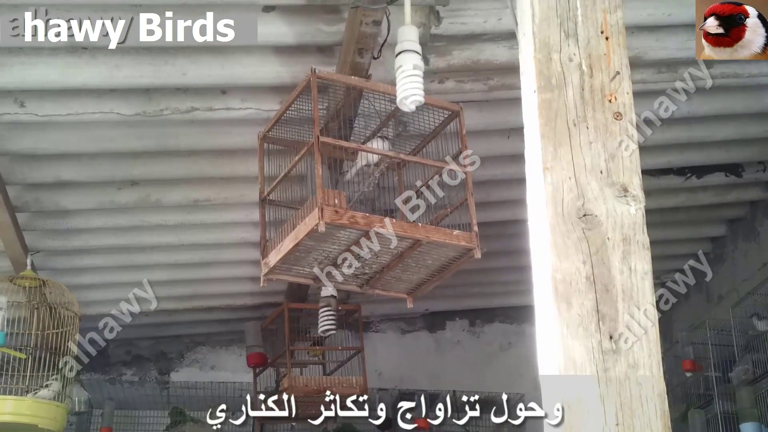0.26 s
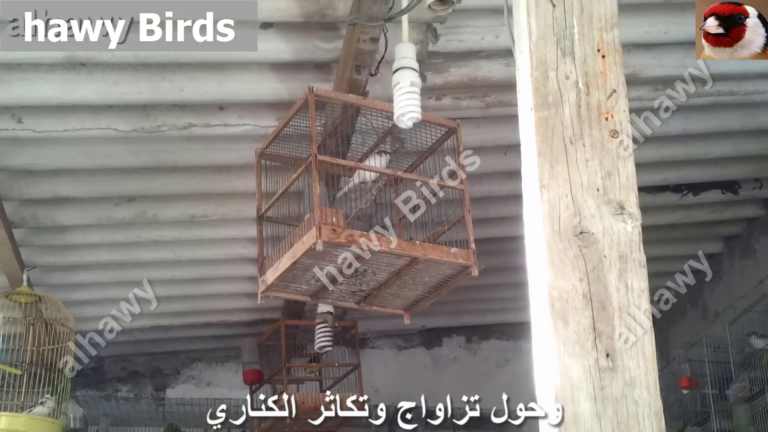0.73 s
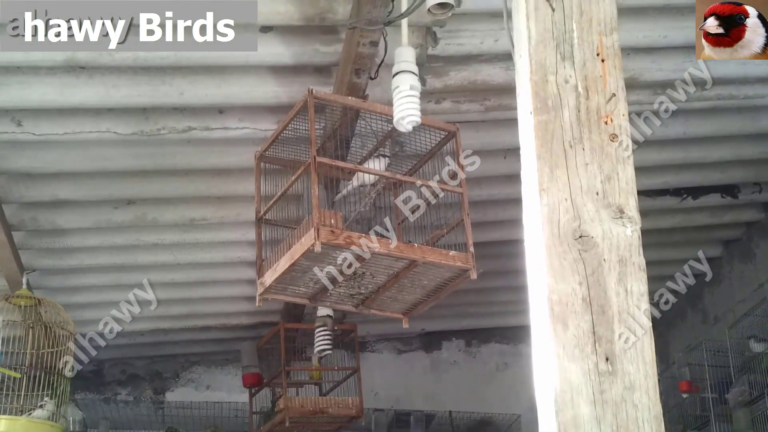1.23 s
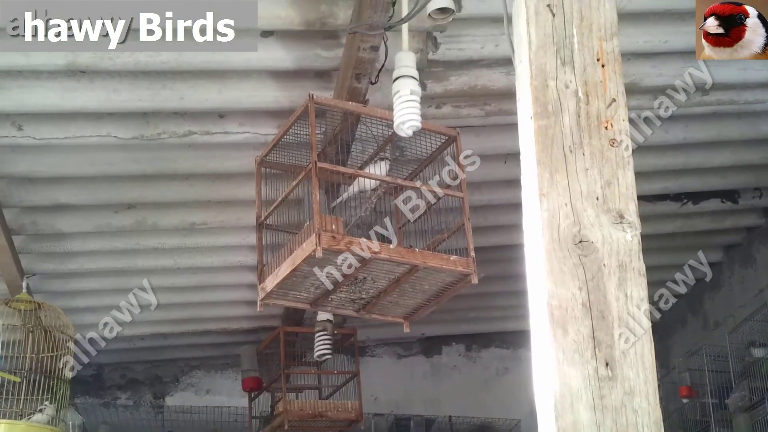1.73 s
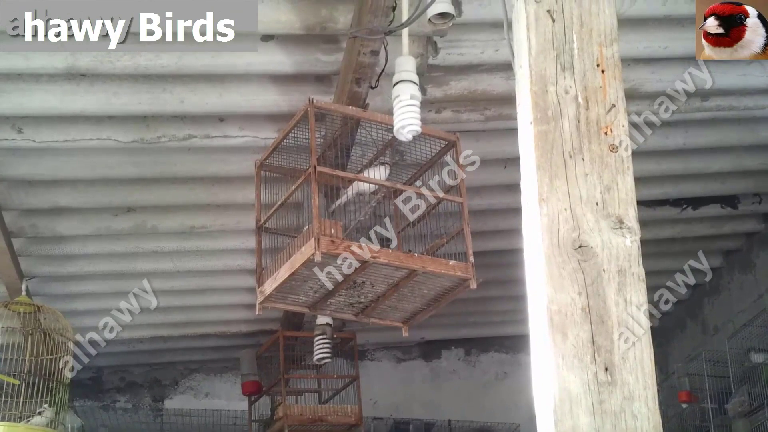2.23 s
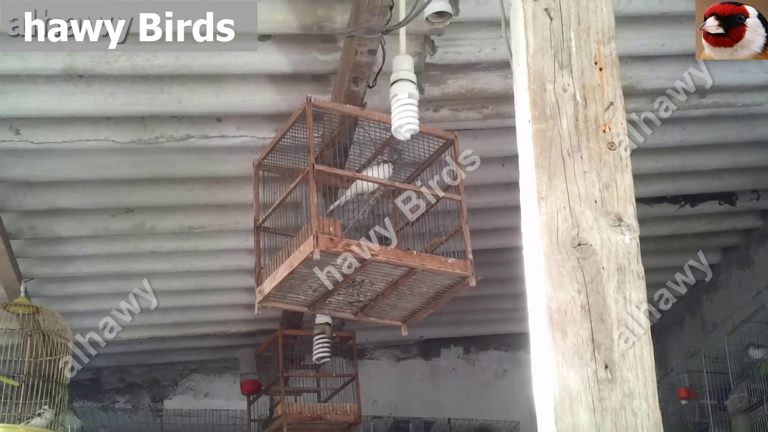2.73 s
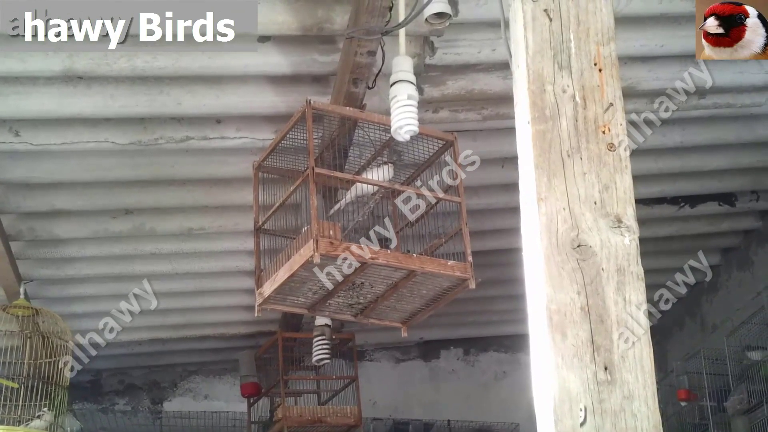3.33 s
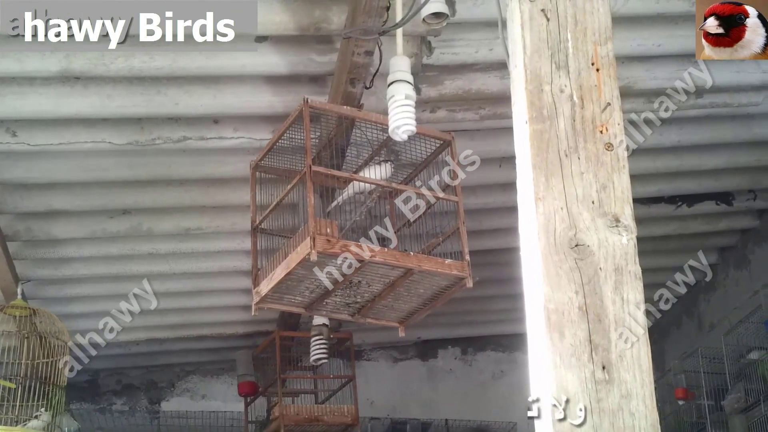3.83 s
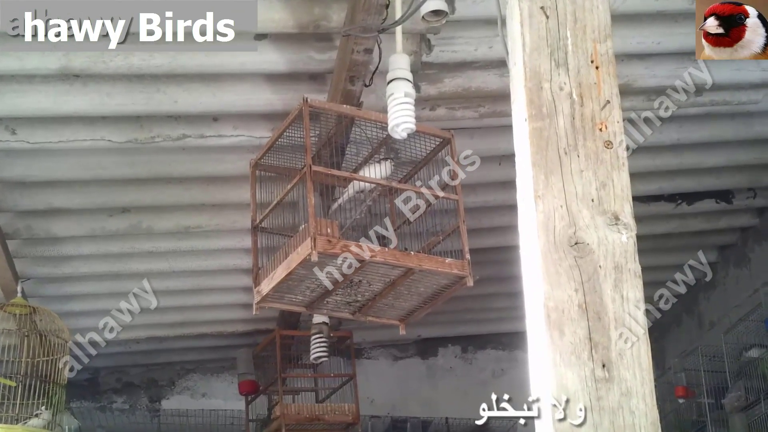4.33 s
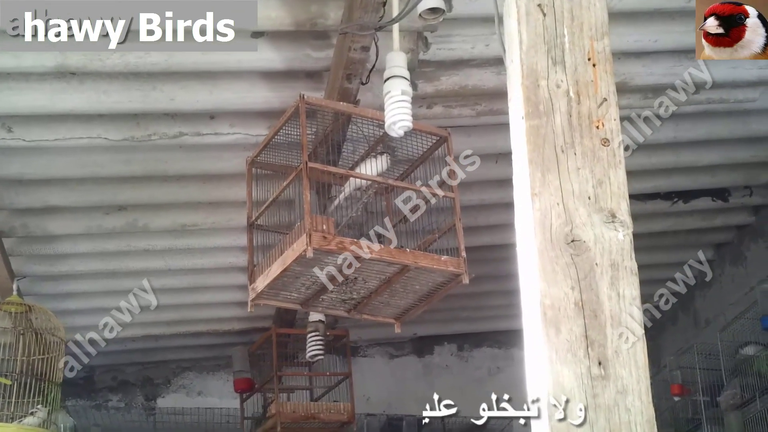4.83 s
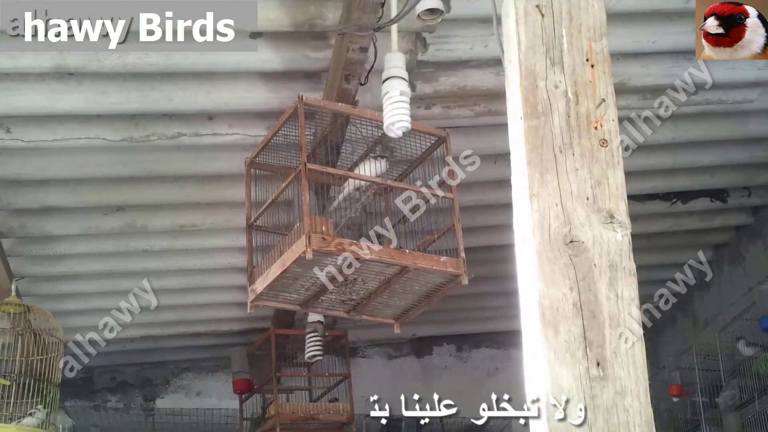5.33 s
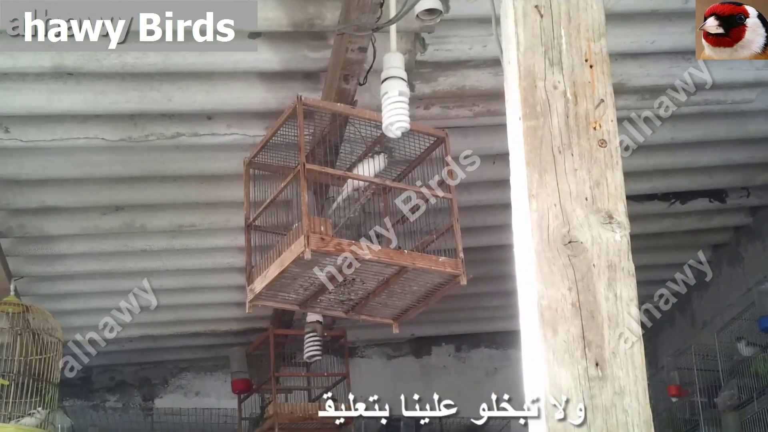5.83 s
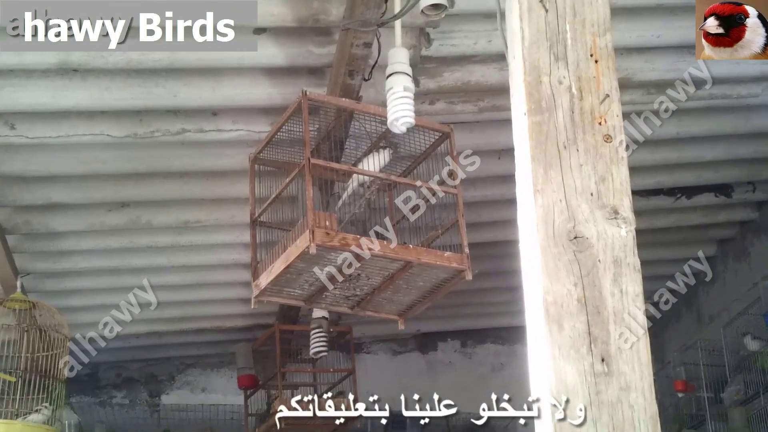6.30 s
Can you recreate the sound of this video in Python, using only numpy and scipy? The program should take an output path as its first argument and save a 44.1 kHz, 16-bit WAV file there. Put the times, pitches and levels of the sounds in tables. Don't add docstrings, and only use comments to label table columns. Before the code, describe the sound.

In a hard-roofed shed a canary a few metres away finishes a low falling roll and fading buzz, then rests. Faint chirps and small cage ticks fill the gap. It resumes with a short high roll and a dry rattle that swells into a long, loud, gradually slowing trill, ending in clear whistles. A low fan hum and light hiss run beneath, picked up by a handheld stereo microphone.

```python
import sys
import numpy as np
from scipy import signal
from scipy.fft import rfft, irfft
from scipy.io import wavfile
from scipy.ndimage import uniform_filter1d

SR = 44100
rng = np.random.default_rng(int(sys.argv[2]) if len(sys.argv) > 2 else 0)


def volts_from_decibels(level):
    exponent = np.asarray(level, float) / 20
    return 10 ** exponent


def wrap_up_sound(samples):
    columns = np.atleast_2d(samples).T
    tamed = np.clip(columns, -1, 1)
    steps = np.round(tamed * 32767).astype(np.int16)
    wavfile.write(sys.argv[1], SR, steps)


N = 289296
LEAD_S = 0.15


def level(x, db):
    return x * volts_from_decibels(db) / np.sqrt(np.mean(x ** 2))


def along(table, hz):
    table_hz, value = np.transpose(table)
    return np.interp(np.log(hz + 1), np.log(table_hz), value)


def walk(rate, size):
    k = max(int(SR / rate), 2)
    smooth = uniform_filter1d(uniform_filter1d(rng.standard_normal(size + 2 * k), k), k)
    return smooth[k:k + size] * np.sqrt(1.733 * k)


def silence():
    return np.zeros((2, N + int(LEAD_S * SR)))


def add(track, start, sound):
    i = int((start + LEAD_S) * SR)
    track[..., i:i + sound.shape[-1]] += sound[..., :track.shape[-1] - i]


def ports(sound, pan_db):
    return sound * volts_from_decibels(np.array([[pan_db], [-pan_db]]) / 2)


# frequency in Hz, level in dB per Hz.
HISS_SPECTRUM = [(900, 9.5), (1500, 6), (4500, 2.5), (8000, -4.5), (11000, 0.5), (13000, -1.5), (15000, 2)]


def hiss():
    hz = np.arange(N // 2 + 1) * SR / N
    spectrum = rfft(rng.standard_normal((2, N))) * volts_from_decibels(along(HISS_SPECTRUM, hz)) * (hz > 500)
    return level(irfft(spectrum, N), -61.5)


# frequency in Hz, level in dB per Hz.
HUM_SPECTRUM = [(30, -29.5), (150, -7.5), (199, 5), (330, -6.5), (725, -22), (863, -32), (1300, -35),
                (1700, -81)]
# frequency in Hz, correlation from 0 to 1.
HUM_COHERENCE = [(30, 0.31), (130, 0.91), (290, 0.84), (630, 0.69), (1200, 0.02)]
# time in seconds, bass gain in dB.
DRAUGHT = [(0, -3.5), (.55, -7), (1, -4.5), (1.3, 0), (3.499, -1), (4.1, 6.5), (5.2, 7.5), (5.498, 1),
           (6.56, 6)]


def fan():
    hz = np.arange(N // 2 + 1) * SR / N
    alike = np.clip(along(HUM_COHERENCE, hz), 0, 1)
    mid, side = rfft(rng.standard_normal((2, N))) * volts_from_decibels(along(HUM_SPECTRUM, hz)) * (hz > 15)
    common, differing = mid * np.sqrt(1 + alike), side * np.sqrt(1 - alike)
    pair = np.array([common + differing, common - differing])

    deep = 1 / (1 + (hz / 110) ** 4)
    upper = 1 / (1 + (350 / (hz + 1)) ** 4)
    draught_db = np.interp(np.arange(N) / SR, *np.transpose(DRAUGHT))
    rumble = irfft(pair * deep, N) * volts_from_decibels(draught_db + 2 * walk(6.9, N))
    rumble += irfft(pair * upper, N) * volts_from_decibels(1.5 * walk(7.4, N))
    rumble += irfft(pair * (1 - deep - upper), N)

    blade_hz = 231.3 * (1 + 0.02547 * walk(5.97, N))
    blade = np.sin(2 * np.pi * np.cumsum(blade_hz) / SR)
    return ports(level(rumble, -42.5) + level(blade, -50.5) * volts_from_decibels(2 * walk(12.0, N)), 2.5)


# start in seconds, length in
# seconds, low edge in Hz, high edge in Hz, level in dB.
RUSTLES = [(1.12, 0.0041, 4000, 9000, -51.5), (1.567, 0.024, 6000, 14200, -62.5),
           (1.91, 0.024, 1000, 13700, -55.5), (2.02, 0.0023, 900, 9000, -80), (2.158, 0.1, 3320, 5650, -68),
           (2.233, 0.076, 2420, 3900, -63), (1.0, 0.09, 2800, 4800, -72), (6.25, 0.14, 1200, 2200, -61.5),
           (2.373, 0.017, 5940, 13200, -77), (2.468, 0.02, 1500, 11600, -60),
           (4.661, 0.021, 3600, 6660, -50.5), (6.457, 0.019, 3940, 14400, -54.5)]


def rustles():
    out = silence()
    for s, length, low_hz, high_hz, db in RUSTLES:
        n = int(length * SR)
        crackle = rng.standard_normal(n) * volts_from_decibels(5.0 * walk(680, n)) * np.hanning(n) ** .5
        band = signal.butter(2, [low_hz, high_hz], "band", fs=SR, output="sos")
        add(out, s, level(signal.sosfilt(band, crackle), db))
    return out


def overtone_notch(hz):
    dip_hz, dip_width_hz, dip_depth = 12200, 660, 0.81
    return (hz < 20000) * (1 - dip_depth * np.exp(-((hz - dip_hz) / dip_width_hz) ** 2))


# low edge in Hz, high edge in Hz.
BREATH_BAND = (3600, 7240)


def whistle(s, hz, db, overtones_db, wobble, growth_db=0, haze_db=-14):
    breath_db, husky_db, unsteady_db = -30, -22, 1.1
    throat_share = 0.19
    effort_slew_s = 0.003
    t = np.arange(s[0], s[-1], 1 / SR)
    n = len(t)
    pitch = uniform_filter1d(np.interp(t, s, hz), 90, mode="nearest") * (1 + wobble * walk(157.0, n))
    phase = 2 * np.pi * (np.cumsum(pitch) / SR + rng.random())
    effort_db = uniform_filter1d(np.interp(t, s, db), int(effort_slew_s * SR), mode="nearest")
    effort_db = effort_db + unsteady_db * walk(94.0, n)
    air = signal.lfilter(*signal.butter(2, BREATH_BAND, "band", fs=SR), rng.standard_normal(n))

    upper = np.zeros(n)
    for multiple, over_db in enumerate(overtones_db, 2):
        upper += volts_from_decibels(over_db) * np.sin(multiple * phase) * overtone_notch(multiple * pitch)
    upper *= 0.35 + volts_from_decibels(haze_db) * walk(600, n)
    undamped_db = throat_share * (effort_db.max() - effort_db)
    upper *= volts_from_decibels(undamped_db + growth_db * np.linspace(-.5, .5, n))

    tone = np.sin(phase) + volts_from_decibels(breath_db) * air + upper
    tone *= 1 + volts_from_decibels(husky_db) * walk(1094, n)
    edge = np.clip(np.minimum(t - s[0], s[-1] - t) / 0.001, 0, 1)
    return np.sqrt(2) * tone * edge * volts_from_decibels(effort_db)


# start in seconds, level in dB, pitch factor.
CHIRPS = [
    (.005, -64, 0.96),
    (0.52, -56, 0.95),
    (1.132, -53, 1.01),
    (1.74, -54.5, 1),
    (2.501, -52.5, 1.02),
    (3.406, -52, 0.99),
    (5.63, -52.5, 1),
]
# time in ms, pitch in Hz, effort in dB.
CHIRP = [(0, 6000, -8), (10, 6030, 1), (40, 5680, 3), (65, 5450, -4), (80, 5400, -20)]
# start in seconds, length in seconds, start pitch in Hz, level in dB.
FALLING_NOTES = [(.95, .05, 1130, -75), (1.035, .023, 4510, -71), (1.055, .014, 3690, -68),
                 (1.2, .04, 4000, -74), (1.21, .07, 3400, -75), (1.235, .05, 5250, -62),
                 (1.45, .05, 3750, -77), (1.51, .05, 2650, -72), (1.53, .04, 5400, -72),
                 (1.535, .06, 4420, -70), (2.156, .033, 5100, -73), (2.27, .019, 4800, -65),
                 (2.4, .05, 4800, -73), (2.65, .089, 4450, -69), (4.93, .065, 8400, -64),
                 (6.405, .035, 5350, -53), (6.488, .056, 4360, -55)]
LEVEL_NOTES = [(.14, .015, 5180, -59), (2.2, .03, 4705, -67), (2.27, .02, 5250, -64),
               (3.49, .12, 4353, -64), (3.5, .048, 8720, -66), (4.125, .02, 4400, -60),
               (4.245, .045, 5300, -56.5), (4.31, .03, 5300, -61), (4.36, .015, 4540, -62),
               (5.43, .03, 4300, -60), (5.751, .049, 4500, -58), (6.46, .016, 6800, -52.5)]
RISING_NOTES = [(1.849, .06, 4390, -64), (1.868, .035, 8900, -73), (2.187, .08, 3776, -72),
                (2.2, .04, 5200, -70), (2.26, .03, 2800, -64), (4.942, .03, 4050, -59),
                (5.808, .02, 5100, -57)]
SCOLDS = [
    (6.465, 0.0043, 6760, -38),
    (6.47, 0.016, 5840, -52),
]
NOTE_KINDS = [(FALLING_NOTES, 0.924), (LEVEL_NOTES, 1), (RISING_NOTES, 1.05), (SCOLDS, 0.59)]


def far_birds():
    out = silence()
    ms, hz, db = np.transpose(CHIRP)
    for s, chirp_db, factor in CHIRPS:
        lower = whistle(ms / 1000, hz * factor, db + chirp_db, (-30,), 0.01)
        upper = whistle(ms / 1000, hz * factor * 1.125, db + chirp_db - 10.5, (), 0.01)
        add(out, s, ports(lower + upper, 1.3))

    swell = np.array([0, .2, .7, 1])
    swell_db = 0.1 + np.array([8.0, 3.0, 5.5, -8.0])
    for notes, glide in NOTE_KINDS:
        for s, length, start_hz, note_db in notes:
            pitch = start_hz * glide ** swell
            note = whistle(swell * length, pitch, note_db + swell_db, (-34,), 0.03)
            add(out, s, ports(note, 3 + 2.5 * rng.standard_normal()))
    return out


# time in seconds, pitch in Hz, level in dB.
WHISTLES = [
    [(2.468, 2200, -54), (2.482, 2930, -52), (2.492, 3075, -49.5), (2.515, 3280, -41), (2.522, 3300, -75)],
    [(6.297, 2540, -39), (6.31, 2730, -33), (6.345, 2880, -21), (6.372, 2928, -34.5), (6.395, 2955, -24.5),
     (6.42, 2956, -33), (6.44, 2980, -43), (6.457, 3083, -46), (6.467, 2960, -73)],
    [(6.512, 2700, -63), (6.53, 2740, -26.5), (6.545, 2860, -29.5), (6.575, 3140, -5)],
]
# levels of the 2nd, 3rd and 4th harmonics in dB.
WHISTLE_OVERTONES = [
    (-8, -14, -30),
    (-27, -34, -55),
    (-27, -33, -50),
]


def held_whistles():
    out = silence()
    for rows, overtones_db in zip(WHISTLES, WHISTLE_OVERTONES):
        s, hz, db = np.transpose(rows)
        add(out, s[0], ports(whistle(s, hz, db, overtones_db, 0.004), 1.5))
    return out


# time in ms from its centre, pitch in Hz, effort in dB.
FALL = [(-27.5, 2900, -19), (-21, 2780, -10), (-12.5, 2620, 3), (-2.5, 2470, 3.5), (5.5, 2320, 1.5),
        (14, 2140, -10.5)]
HIGH_FALL = [(-24, 4080, -10), (-17, 3980, -1.5), (-7, 3800, -1.5), (2.5, 3620, 1.5), (12.5, 3330, -4),
             (19, 2800, -19)]
FLICK = [(-6.5, 2350, -4), (-5.5, 2600, -3.5), (-3.5, 3300, 10), (-1.5, 3720, -1), (0, 5000, -9)]
FAST_RISE = [(-16, 1400, -35), (-10, 2400, -18.5), (-10, 2695, -3.5), (-4, 3000, 4.5), (2.5, 3200, 3),
             (7.5, 3273, -4.5), (9.5, 3600, -52)]
MID_RISE = [(-23, 1900, -22.5), (-15.5, 2420, -22.5), (-16.5, 2684, -2), (-8, 3000, 3.5), (1, 3170, -1),
            (14.5, 3290, -12), (10.5, 4000, -45)]
SLOW_RISE = [(-30, 1900, -26), (-21, 2450, -20), (-21.5, 2740, -1), (-16, 2930, 0.5), (-8, 3070, -0.5),
             (-0.5, 3170, 3), (6, 3275, -4.5), (10, 3310, -45)]
BUZZ = [(-8, 2100, -15), (-5.5, 2050, -11), (2, 1820, -1), (5.5, 1420, -2.5), (6.5, 830, -27)]
# centre in seconds, level in dB.
FALLING_ROLL = [(-0.11, -38), (-0.058, -28), (-0.006, -39), (0.039, -35.0), (0.093, -35), (0.145, -35.5),
                (0.199, -35), (0.253, -33), (0.311, -33), (0.365, -34), (0.425, -33.5), (0.485, -34),
                (0.542, -33.5), (0.602, -34.5), (0.662, -33.5), (0.722, -38.5)]
FADING_BUZZ = [(.73, -37), (.752, -42), (.77, -44), (.785, -41.5), (.8, -42), (.815, -47), (.832, -43.5),
               (.85, -40), (.868, -48), (.884, -59.5), (.9, -74), (.92, -67)]
HIGH_ROLL = [(2.533, -46.0), (2.581, -37.5), (2.629, -38.5), (2.679, -40), (2.729, -39), (2.785, -41),
             (2.844, -46)]
RATTLE = [(2.977, -50), (3.0, -53), (3.022, -51), (3.046, -49), (3.07, -46.5), (3.095, -50), (3.119, -48.5),
          (3.144, -46), (3.167, -46.5), (3.192, -45.5), (3.218, -44), (3.24, -46), (3.267, -47),
          (3.292, -45), (3.317, -43.5), (3.343, -42.5), (3.37, -42), (3.396, -41), (3.422, -41.5),
          (3.447, -41), (3.475, -43), (3.5, -42), (3.527, -42), (3.553, -43.5), (3.581, -41)]
FAST_TRILL = [(3.656, -35.5), (3.694, -33.5), (3.732, -33), (3.77, -31.5), (3.807, -32), (3.844, -30),
              (3.881, -27), (3.919, -24.5), (3.957, -27.5), (3.995, -28), (4.031, -26.5), (4.069, -27.5),
              (4.108, -29), (4.145, -26.5), (4.184, -31.5), (4.222, -29), (4.26, -27.5), (4.298, -25.5),
              (4.337, -26.5), (4.376, -27.5), (4.414, -30), (4.453, -30.5), (4.491, -28), (4.53, -29.5),
              (4.569, -32.0)]
MID_TRILL = [(4.61, -25), (4.653, -26), (4.697, -22.5), (4.741, -22), (4.785, -23), (4.83, -22.5),
             (4.875, -23.5), (4.921, -23.5), (4.969, -21.5), (5.016, -20.5), (5.066, -20), (5.113, -23.5),
             (5.16, -22.5), (5.209, -21.5), (5.258, -21.5)]
SLOW_TRILL = [(5.313, -22), (5.365, -20.5), (5.42, -22.0), (5.474, -23), (5.528, -21.5), (5.58, -23.5),
              (5.636, -23.5), (5.691, -21.5), (5.747, -24), (5.802, -21.5), (5.86, -20.5), (5.919, -21.5),
              (5.977, -21), (6.036, -22), (6.092, -23), (6.149, -21.5), (6.207, -23.5)]
FALL_OVERTONES = (-27, -28, -34, -62, -36)
# syllables, shape, overtones from the 2nd in dB, overtone growth through a syllable in dB,
# share the pitch climbs over the phrase, overtone flutter in dB.
PHRASES = [(FALLING_ROLL, FALL, FALL_OVERTONES, 27.7, 0.034, -7),
           (FADING_BUZZ, BUZZ, (-18, -19, -21), .1, -0.31, -10),
           (HIGH_ROLL, HIGH_FALL, (-19, -20, -62), -18, 0.011, -13.5),
           (RATTLE, FLICK, (-16.5, -49, -58), -13, 0.027, -8),
           (FAST_TRILL, FAST_RISE, (-25.5, -30.5, -30), 0.85, 0.015, -8),
           (MID_TRILL, MID_RISE, (-25.5, -29, -30.5), 1.6, 0.00089, -12.5),
           (SLOW_TRILL, SLOW_RISE, (-23.5, -29, -35), 1.2, 0.0031, -17)]
# time in seconds, left minus right in dB.
HEAD_TURN = [(.7, 0.5), (2.5, 2), (4.2, 1.5), (4.8, 1), (5.7, 2), (6.3, 1)]


def canary_phrases():
    out = silence()
    for syllables, shape, overtones_db, growth_db, climb, haze_db in PHRASES:
        ms, hz, db = np.transpose(shape)
        for k, (centre, effort_db) in enumerate(syllables):
            chance = rng.standard_normal(3)
            times = ms / 1000 * (1 + .04 * chance[0])
            factor = 1 + climb * (k / (len(syllables) - 1) - .5) + 0.0074 * chance[1]
            syllable_db = db + effort_db + 0.5 * chance[2]
            sound = whistle(times, hz * factor, syllable_db, overtones_db, 0.0036, growth_db, haze_db)
            add(out, centre + times[0], ports(sound, np.interp(centre, *np.transpose(HEAD_TURN))))
    return out


# delay in ms, level in dB.
ECHOES = [
    [(2.11, -18), (3.5, 0), (6.29, -30), (8.4, -26), (11.59, -6), (16.92, -28.5)],
    [(2.14, -38.5), (2.48, -13.5), (5.08, -17), (7.19, -1), (10.46, -7), (14.83, -6.5)],
]
# frequency in Hz, gain in dB.
TAIL_COLOUR = [(1500, -3), (2200, 2.5), (2900, 0), (4500, 4), (7000, 3), (13000, 4)]


def shed(sound, tail_db, t60, near):
    cluster_db, cluster_t60_s = 7, 0.031
    size = sound.shape[1]
    early = np.zeros((2, 1024))
    early[:, 0] = 1
    if near:
        for port, rows in enumerate(ECHOES):
            for ms, db in rows:
                early[port] += volts_from_decibels(db) * np.sinc(np.arange(1024) - ms * SR / 1000)
    out = signal.fftconvolve(sound, early, axes=1)[:, :size]

    t = np.arange(int(.5 * SR)) / SR
    decay = np.hypot(volts_from_decibels(-60 * t / t60), volts_from_decibels(cluster_db - 60 * t / cluster_t60_s))
    colour = volts_from_decibels(along(TAIL_COLOUR, np.arange(len(t) // 2 + 1) * SR / len(t)))
    shares = np.array([walk(1.284, size) for _ in range(3)])
    for share in shares / np.sqrt(np.sum(shares ** 2, axis=0)):
        tail = rng.standard_normal((2, len(t))) * decay * np.clip(t / 0.0068, 0, 1)
        tail = tail + 0.05 * tail[::-1]
        tail *= volts_from_decibels(tail_db) / np.sqrt(np.sum(tail ** 2, axis=1, keepdims=True))
        tail = irfft(rfft(tail) * colour, len(t))
        out += signal.fftconvolve(sound * share, tail, axes=1)[:, :size]
    power = np.sum(early ** 2, axis=1, keepdims=True) + volts_from_decibels(2 * tail_db)
    return out[:, -N:] / np.sqrt(power)


def scene():
    song = shed(canary_phrases() + held_whistles(), 4.5, 0.3, near=True)
    far = shed(far_birds() + rustles(), 9, 0.23, near=False)
    loudness = np.sqrt(np.abs(uniform_filter1d(np.mean(song ** 2, axis=0), int(.05 * SR))))
    suppression = (1 + loudness / volts_from_decibels(-43)) ** -0.18
    return song + far + fan() + hiss() * suppression


def roll_off(x):
    return signal.sosfilt(signal.butter(12, 15100, fs=SR, output="sos"), x)


def record(dry):
    loudness = np.sqrt(uniform_filter1d(np.mean(dry ** 2, axis=0), int(.3 * SR)))
    duck = (1 + loudness / volts_from_decibels(-31.0)) ** -.25
    low_pass = signal.ellip(8, .3, 70, 14400, fs=SR, output="sos")
    mix = signal.sosfilt(low_pass, dry * duck)
    return roll_off(mix)


dry = scene()
out = record(dry)
wrap_up_sound(out)
```